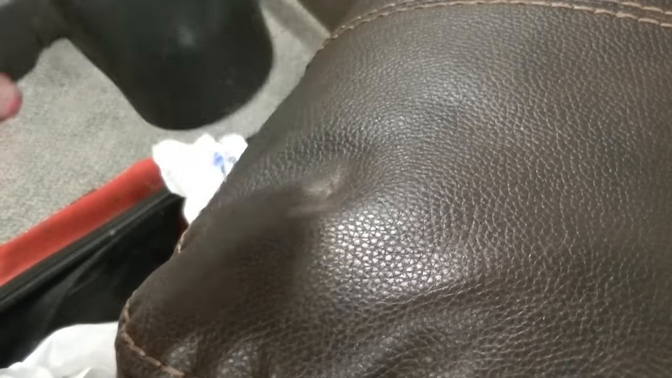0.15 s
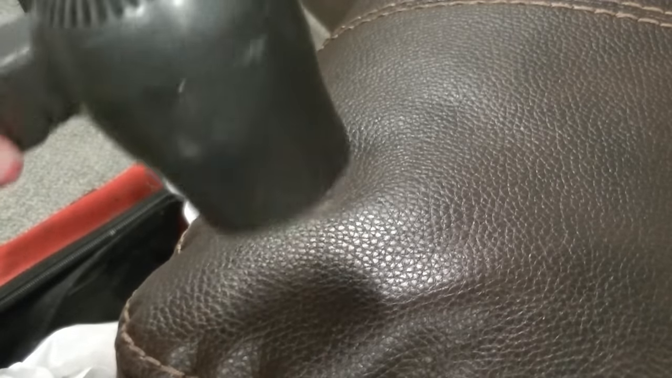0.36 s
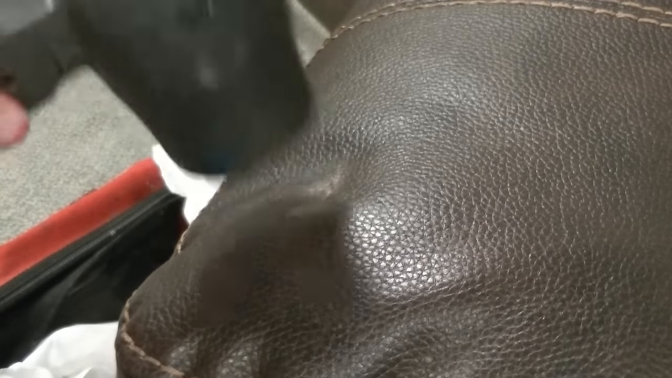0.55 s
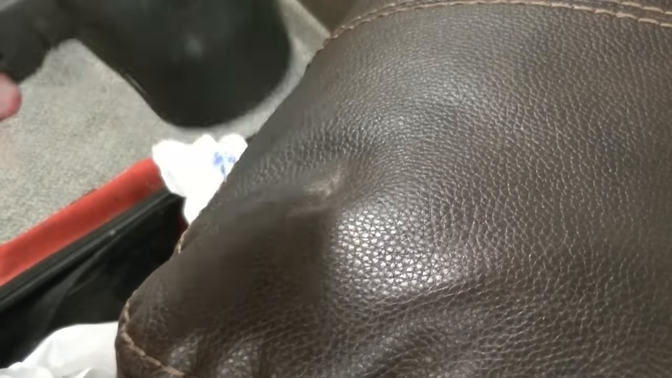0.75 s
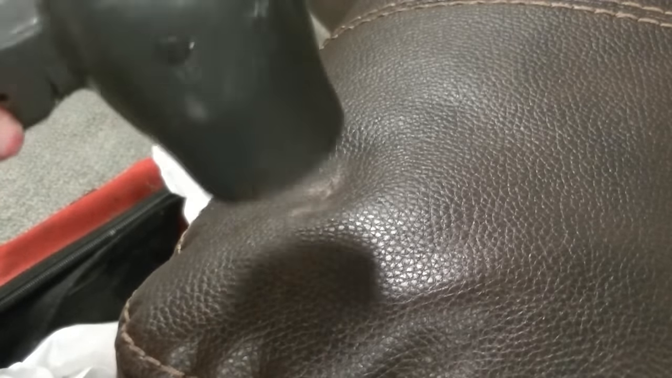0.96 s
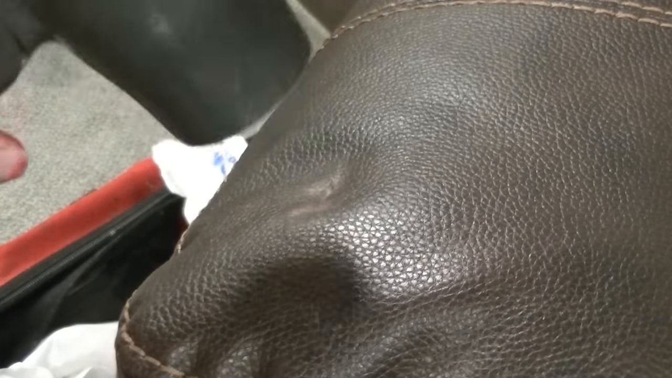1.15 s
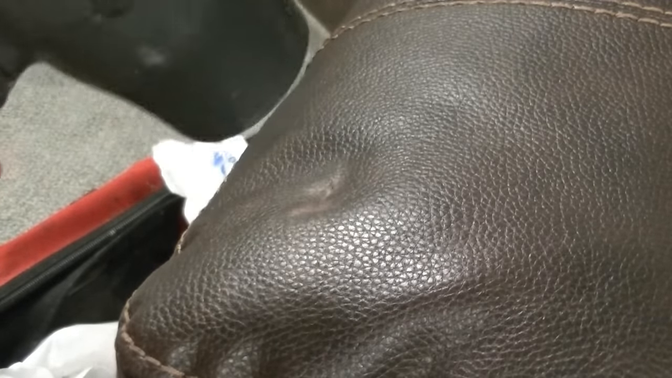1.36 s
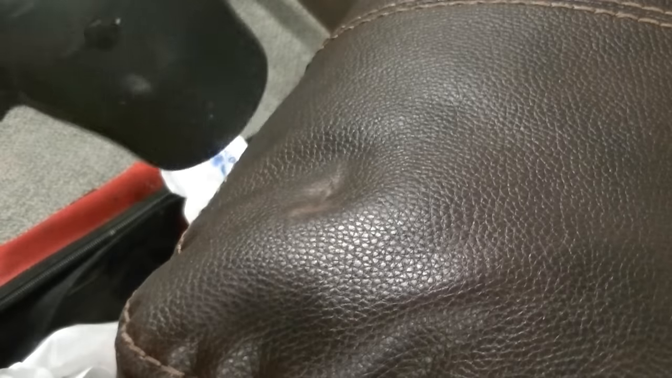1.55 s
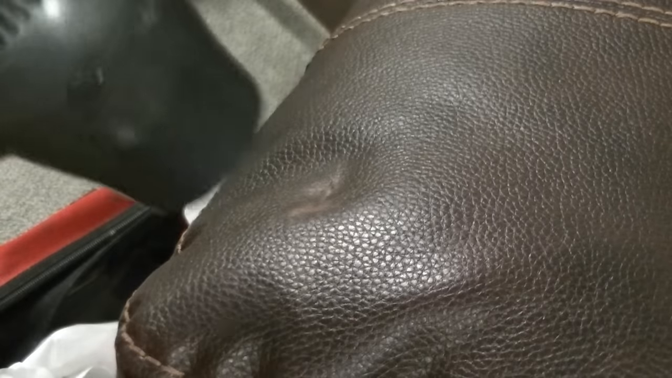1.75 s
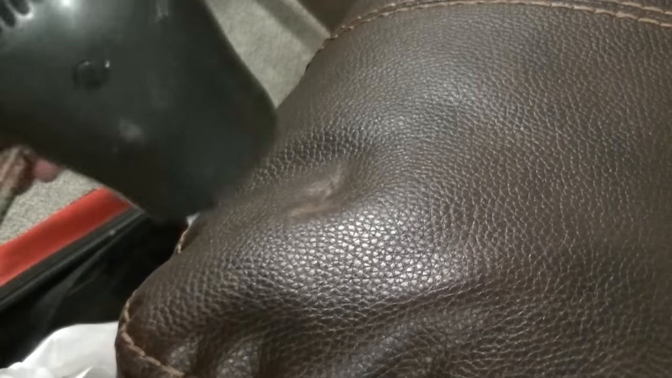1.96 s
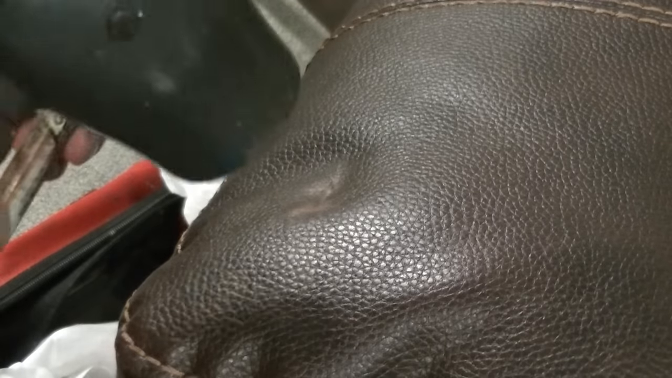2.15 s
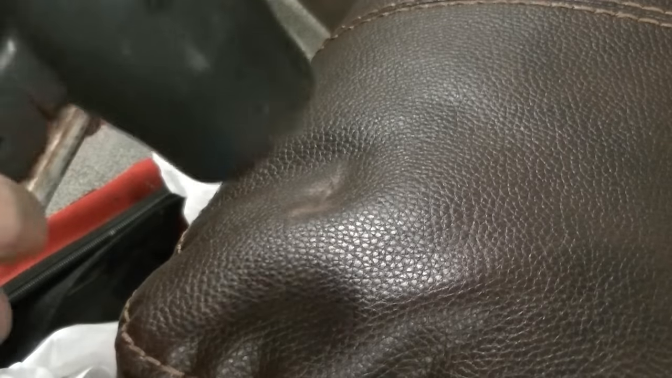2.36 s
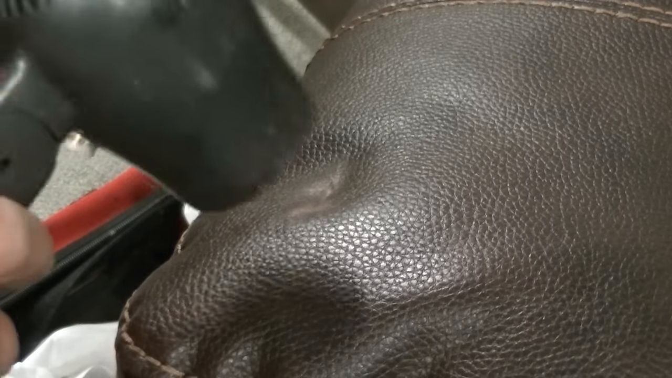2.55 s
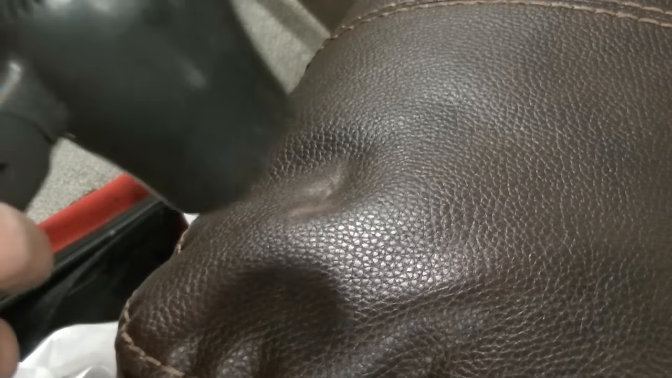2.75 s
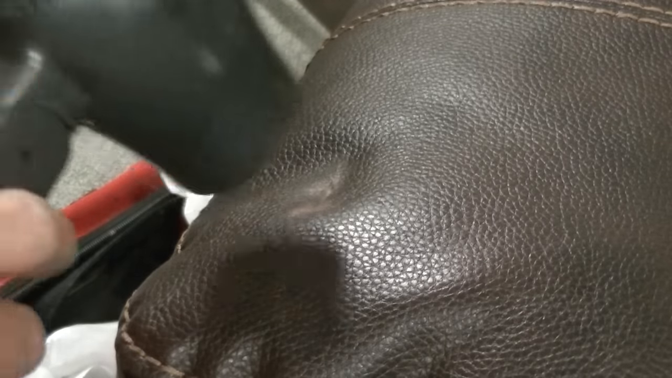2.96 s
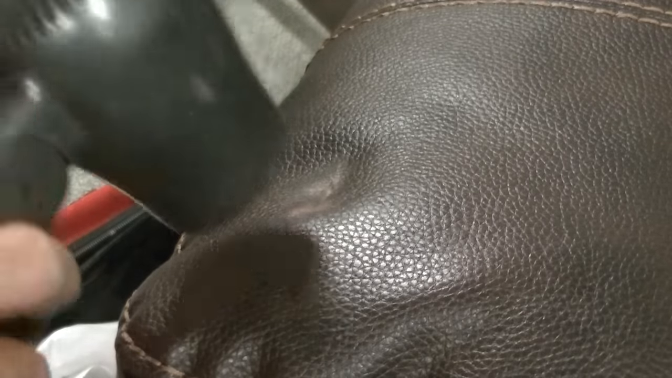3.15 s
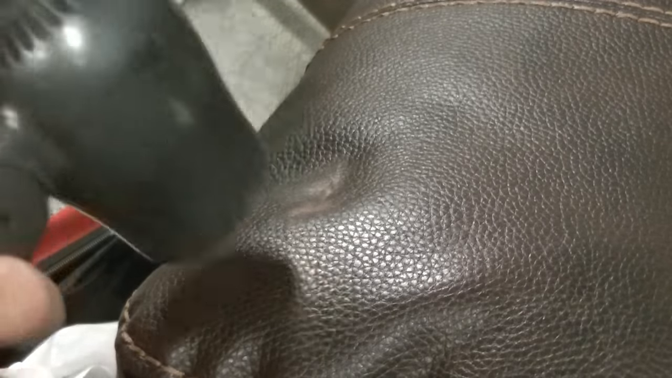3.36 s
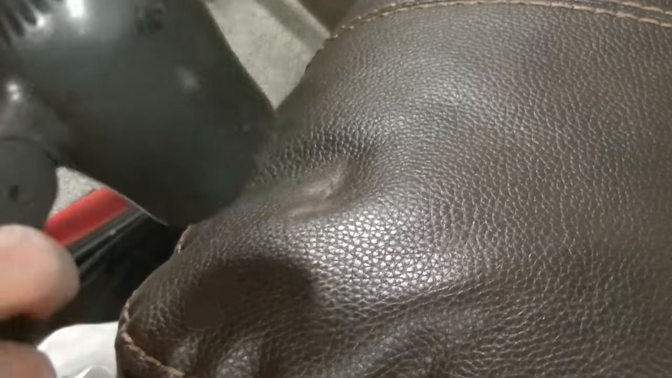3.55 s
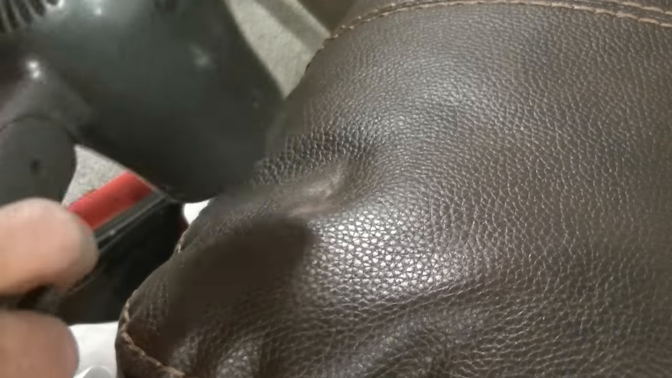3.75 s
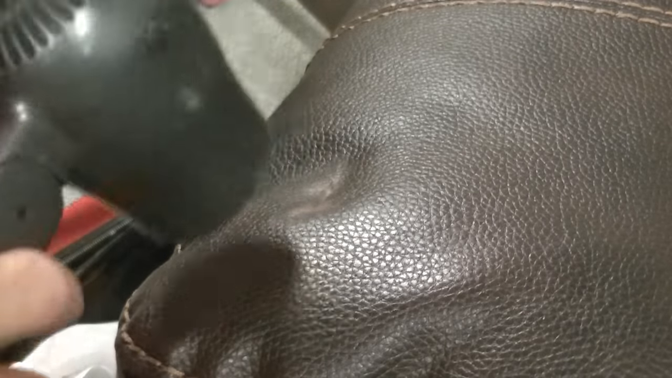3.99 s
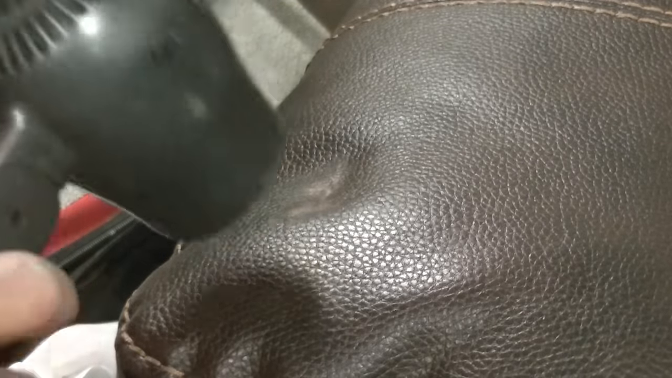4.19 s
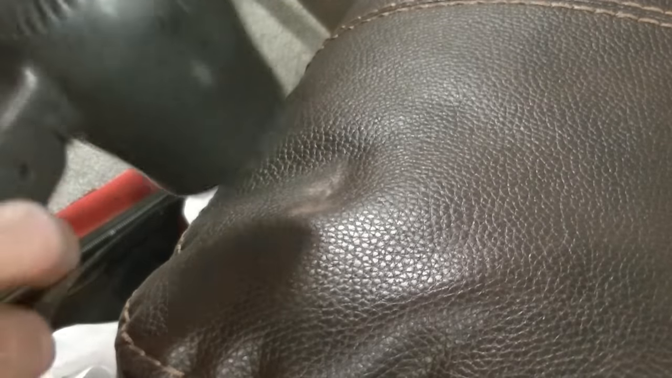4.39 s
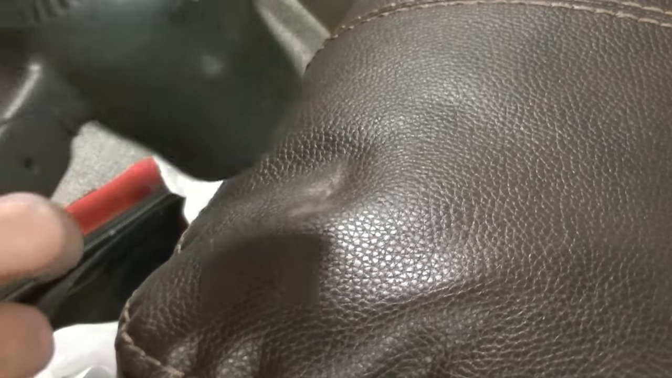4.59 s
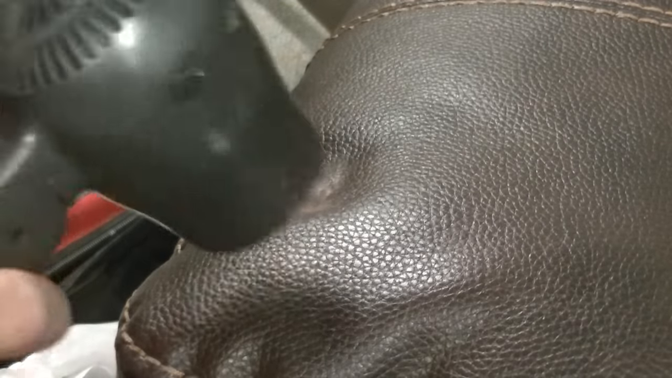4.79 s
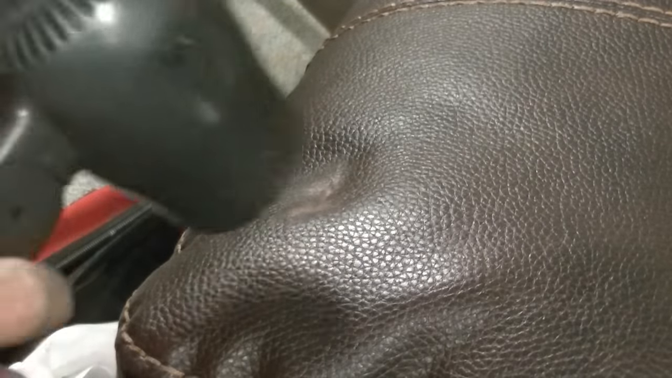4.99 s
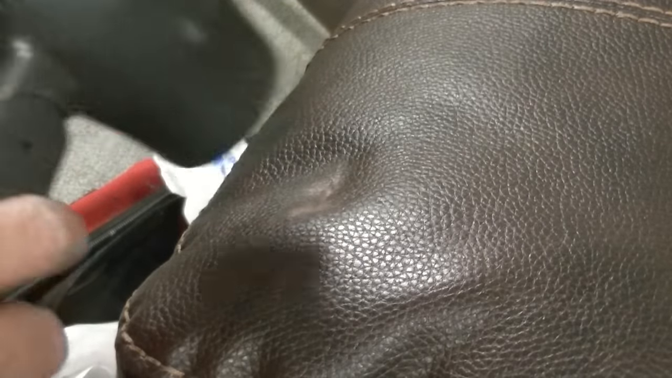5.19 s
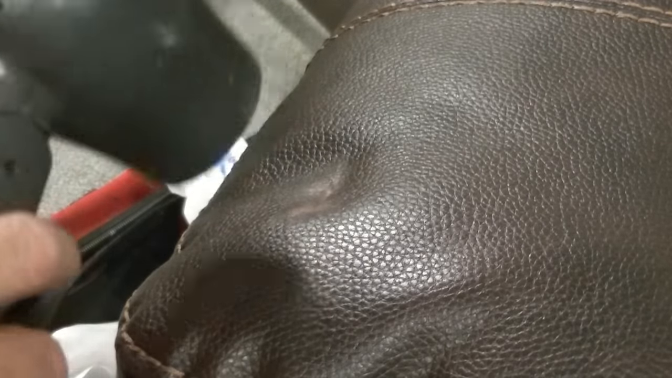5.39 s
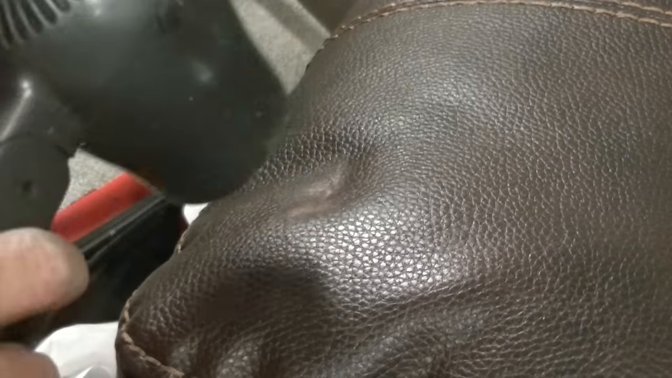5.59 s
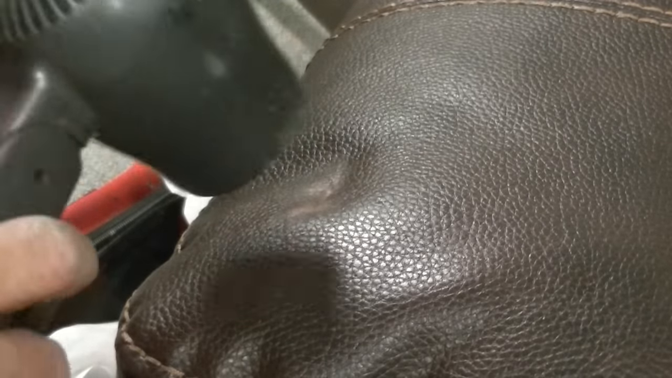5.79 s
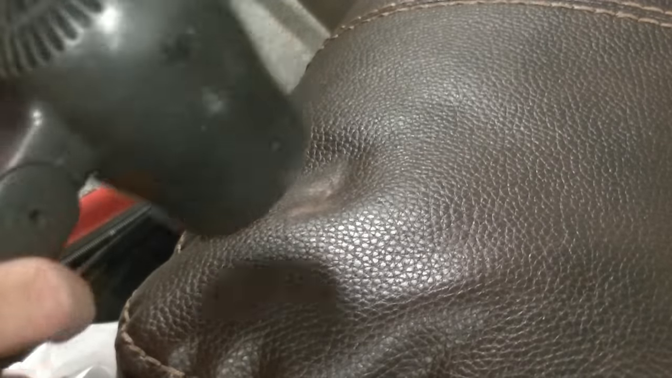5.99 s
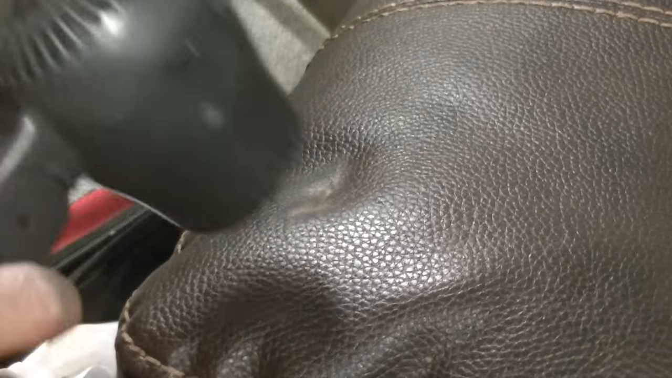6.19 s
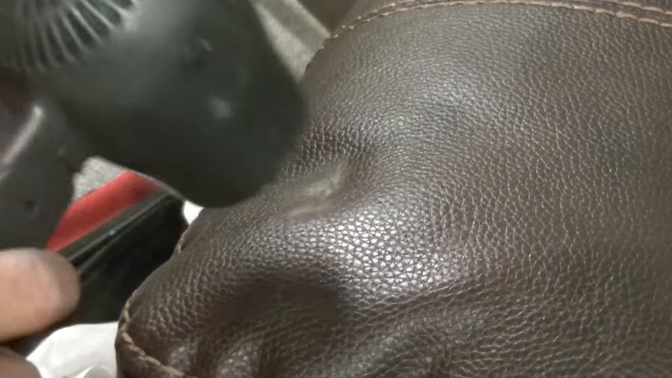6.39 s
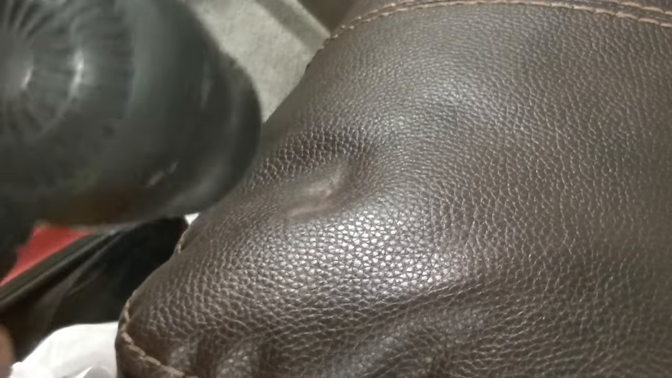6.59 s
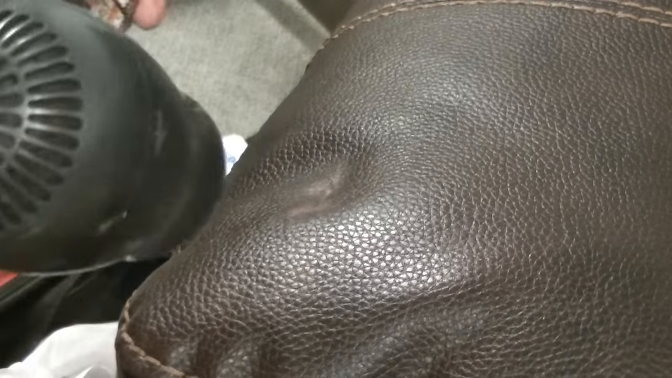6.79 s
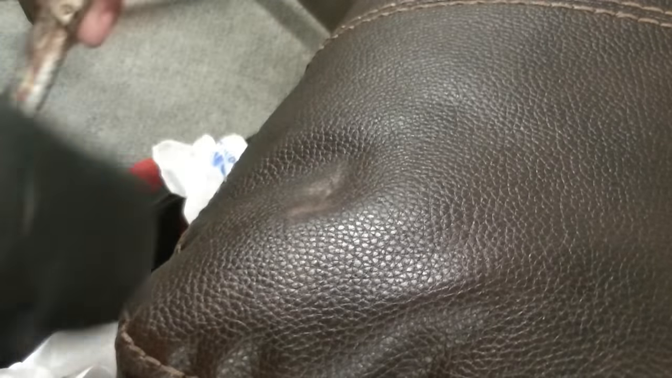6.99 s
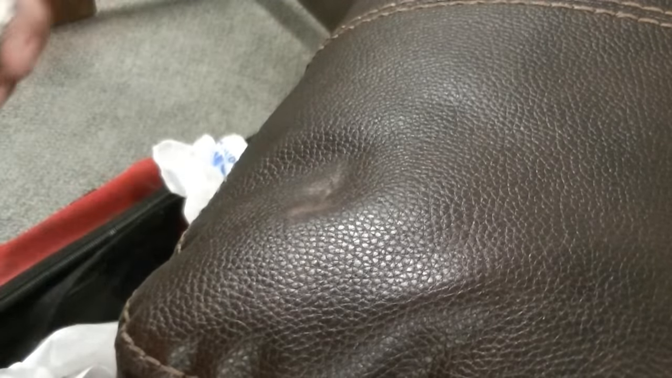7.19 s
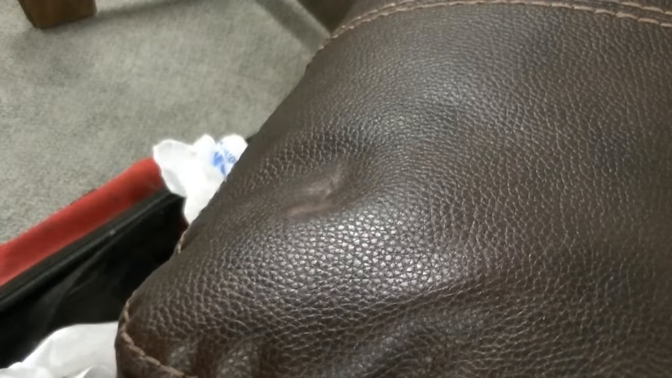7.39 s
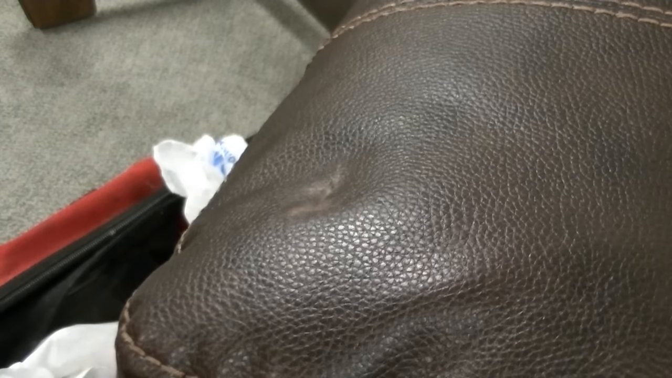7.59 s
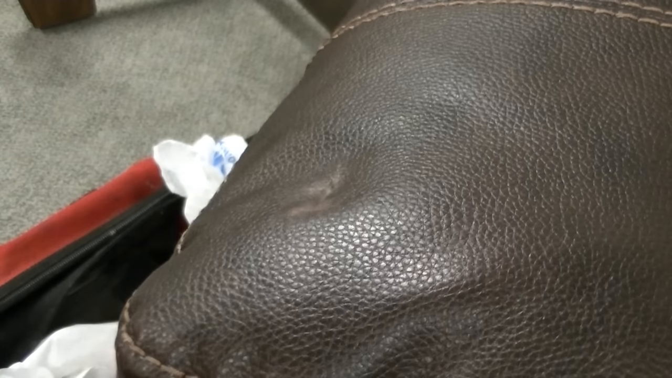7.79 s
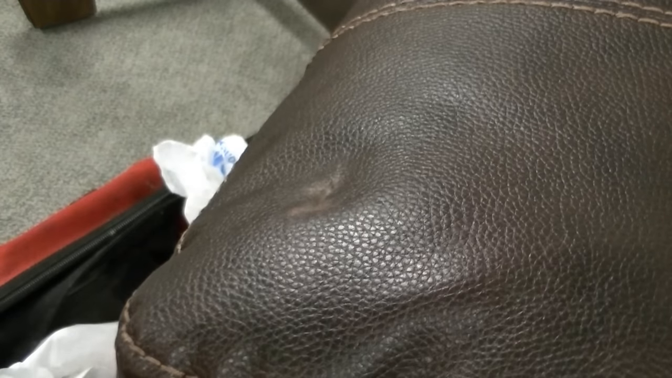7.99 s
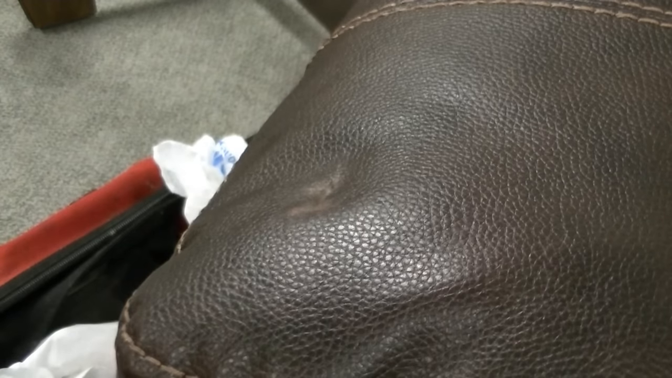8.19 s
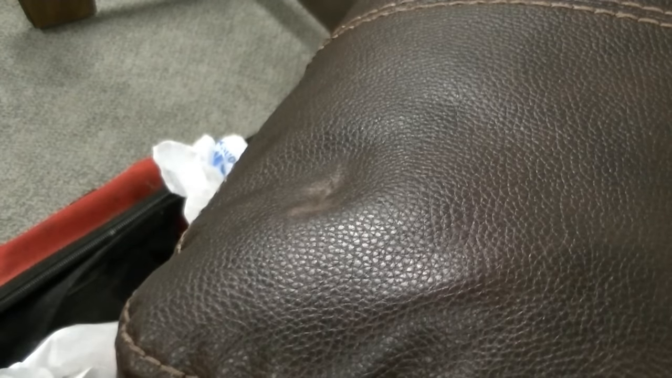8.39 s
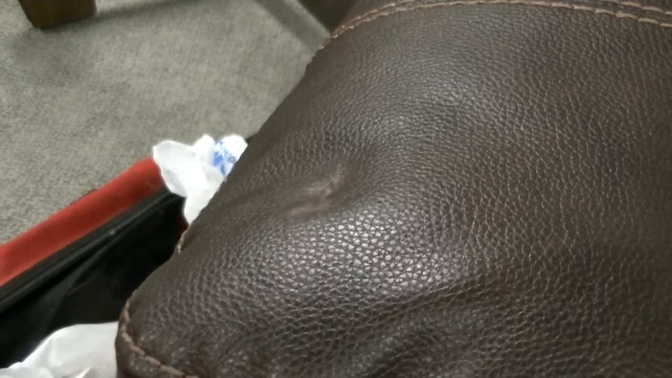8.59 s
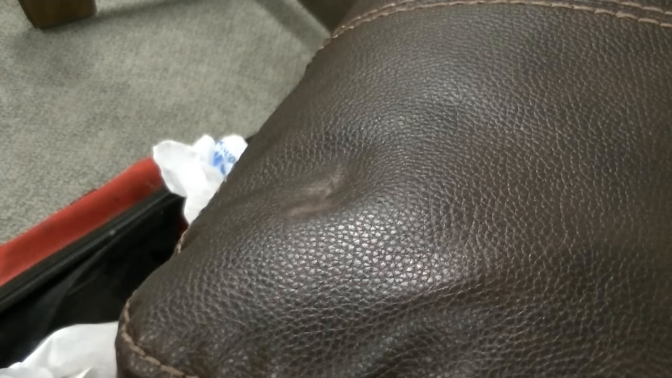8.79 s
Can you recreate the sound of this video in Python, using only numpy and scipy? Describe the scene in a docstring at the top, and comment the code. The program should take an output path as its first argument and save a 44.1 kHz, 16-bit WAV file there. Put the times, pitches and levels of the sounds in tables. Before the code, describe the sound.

A handheld hair dryer runs very close to the microphone in a quiet room, a loud broad air rush with a strong steady whine on top. Quick waving strokes make the tone and airy whistle pulse and bend slightly. Near seven seconds it is switched off; the pitch slides down within half a second, followed by soft rubbing, a few small plastic ticks and faint room murmur.

```python
"""A hair dryer is waved over a leather cushion close to a phone: shaft, seven fan blades and motor whine sing
on multiples of one speed, bent by each stroke, while shaped noise makes the rush, whistle and hiss of the air.
At about seven seconds it is switched off, and its tones glide down as the fan coasts.
Then the hand fumbles and puts it down: resonant noise rubs, short noise bursts tick, a quiet room murmurs."""
import sys
import numpy as np
from scipy import signal
from scipy.fft import rfft, irfft
from scipy.io import wavfile
from scipy.ndimage import uniform_filter1d

SR = 44100
rng = np.random.default_rng(int(sys.argv[2]) if len(sys.argv) > 2 else 0)


def inscribe(sig):
    """Save sig as 16-bit PCM at rate SR to the path in sys.argv[1].

    A 1-D sig is mono; a 2-D sig holds one channel per row.
    Samples are clipped to [-1, 1] before scaling.
    """
    pcm = np.round(np.clip(np.atleast_2d(sig).T, -1, 1) * 32767)
    wavfile.write(sys.argv[1], SR, pcm.astype(np.int16))


N = 390263  # length in samples

# Blade tone and its lower neighbour while running: t/s, blade level/dB, neighbour level/dB
BLADE_TONES = [(0, -19, -26), (1.05, -17, -24.5), (1.55, -21, -28), (2.1, -19.5, -26), (2.4, -18, -25),
               (3.3, -17.3, -23), (5, -18, -22.5), (5.5, -19.5, -24), (6.5, -21, -23.5), (6.7, -21.5, -31),
               (7, -21, -34)]
# Upper tones, stronger as the grille turns to the phone:
# t/s, base level/dB of the second and third blade tones, motor whine level/dB
UPPER_TONES = [(0, -40, -34), (2, -38, -34.5), (3, -35, -33.5), (5, -35, -33.5), (6.4, -35, -32.5),
               (6.7, -38, -31), (7, -38, -29.5)]
# Other multiples of the shaft speed: multiple, level/dB, wavering/dB
SHAFT_TONES = [(1, -47.5, 0.9), (3, -52, 2.5), (4, -44.5, 9.5), (5, -47, 2), (8, -38, 5.5), (10, -37, 4.5),
               (28, -45.5, -2.5)]
# The fan slowing after switch-off: t/s, shaft speed f/Hz, blade tone level/dB
COAST_DOWN = [(7.015, 255.5, -21), (7.046, 238, -23), (7.09, 210, -21), (7.156, 182, -22), (7.18, 173, -20),
              (7.236, 155, -28), (7.302, 135, -32), (7.35, 125, -34), (7.41, 115, -52), (7.6, 85, -75)]


def motor_tones(turn, phase, blade_swell_db):
    """Tones on multiples of the shaft speed; turbulence makes each waver in level and phase."""
    blades, whine_multiple = 7, 35
    blade_db, lower_db = curves(BLADE_TONES)
    upper_db, whine_db = curves(UPPER_TONES)
    _, coast_db = curves(COAST_DOWN)
    off = np.arange(N) / SR > COAST_DOWN[0][0]

    # The blade tone swells with each stroke, mostly on the way in, sometimes on the way out
    blade_db = blade_db - blade_swell_db * np.cos(phase - 0.2) + 0.8 * walk(8)
    lower_db = lower_db + 1.6 * walk(8)
    whine_db = whine_db - 4.2 * np.sin(phase - 0.6)

    # After switch-off the weaker tones die before the blade tone, and the free fan flutters
    fade_db = np.where(off, 1.4 * (coast_db - COAST_DOWN[0][2]) - 12, 0)
    blade_db = np.where(off, coast_db + 2 * walk(40), blade_db)

    def tone(multiple, level_db, waver_db):
        """One sine, its level in dB rms, with random wavering of loudness and phase."""
        loudness = np.sqrt(2) * undb(level_db + waver_db * walk(25))
        return loudness * np.sin(multiple * turn + 0.25 * walk(30))

    out = tone(blades, blade_db, 1.0)
    out += tone(blades - 1, lower_db + fade_db, 0.66)
    out += tone(2 * blades, upper_db + 1 + fade_db, 1.5)
    out += tone(3 * blades, upper_db - 3 + fade_db, 2)
    out += tone(whine_multiple, whine_db + 3 * fade_db, 1.5)
    for multiple, level_db, waver_db in SHAFT_TONES:
        out += tone(round(multiple), level_db + fade_db, waver_db)
    return out


# Shaft speed while running, before the Doppler bend: t/s, f/Hz
RUNNING_SPEED = [(0, 257.2), (.5, 256.8), (1.2, 256.9), (1.5, 256.5), (1.75, 256.3), (2, 256.7), (5, 256.6),
                 (5.45, 255.9), (5.9, 255.9), (6.2, 256.4), (6.6, 255.9), (6.85, 255.4), (7.02, 255.5)]


def shaft_turn(phase, hand_m_s):
    """Shaft angle in radians: the speed added up over time, bent by Doppler shift until switch-off."""
    sound_m_s = 343
    doppler = 1 - hand_m_s * np.cos(phase) / sound_m_s
    running_hz = curves(RUNNING_SPEED)[0] * doppler
    coast_hz, _ = curves(COAST_DOWN)
    off = np.arange(N) / SR > COAST_DOWN[0][0]
    return 2 * np.pi * np.cumsum(np.where(off, coast_hz, running_hz)) / SR


# Strokes of the hand: t/s of the fastest move away from the phone, top speed/(m/s),
# blade tone swell level/dB, whistle swell level/dB
HAND_STROKES = [(-.06, 2.0, 4.5, 1), (.235, 1.9, 0, -3), (.55, 1.7, 3, 4.5), (.855, 1.6, 2, 0),
                (1.125, 1.3, 1.5, 5), (1.4, .5, 1.5, -1), (1.64, 0.67, 1, -1), (1.9, 1.2, 1.5, 5),
                (2.13, 1.1, 3.5, -3), (2.35, 1.2, 0.5, 5), (2.56, 1, -0.5, 9), (2.78, 1.7, 0, 3),
                (2.983, 1.36, 2, 5), (3.183, 1.2, -3, 2), (3.402, 0.77, 3, 4), (3.637, 0.74, 0, 11),
                (3.841, 1.1, 1, 0.5), (4.085, 1.5, -1.5, 2), (4.295, 1.1, 3.5, 0.5), (4.495, 1.2, -2, 10.5),
                (4.725, 1.3, 0, 3.5), (4.994, 1.6, 1, 7), (5.223, 1.3, -0.5, 4.5), (5.47, 1.2, 1, -2.5),
                (5.682, 1.33, 2.5, 5), (5.897, 1.3, 3, -1), (6.106, 1.4, 1.5, 2.5), (6.306, 1.1, 7, 4),
                (6.51, 1.4, 2, 3.5), (6.765, 0.89, -0.5, 1.5), (7.0, .1, -1.5, -2)]


def waving_hand():
    """Each stroke is one cycle: phase in radians (0 = moving away fastest), top speed and the two swells."""
    start_s = np.transpose(HAND_STROKES)[0]
    cycles = np.interp(np.arange(N) / SR, start_s, np.arange(len(start_s)))
    return 2 * np.pi * cycles, *curves(HAND_STROKES)


# Air over time: t/s, level/dB of all the air, then level/dB relative to it of
# the high gap resonance, the barrel whistle and the grille hiss
AIR_LEVELS = [(0, -14, -10.5, -14, -6), (1, -13.5, -11, -14, -7), (1.5, -14, -12, -18.5, -7),
              (2.2, -12.5, -11, -11.5, -7), (2.7, -12.5, -8.5, -20, -7.5), (3.5, -13, -8.5, -19, -5.5),
              (4.4, -12, -8.5, -16, -7.5), (4.8, -13.5, -7, -18, -5.5), (5.5, -12, -9, -15.5, -6.5),
              (6.1, -12, -12, -13, -6.5), (6.67, -11.5, -17.5, -13.5, -5.5), (6.88, -12, -26, -10, -4.5),
              (7.01, -11.5, -13, -13, -5.5), (7.05, -13, -12, -15, -7), (7.17, -21.5, -23, -16.5, -3.5),
              (7.34, -38.5, -18, -13, -9), (7.6, -53, -16, -19, -22)]
# Low resonance of the nozzle-to-leather gap, fading as the nozzle nears and returning as it leaves:
# t/s, level/dB relative to all the air
LOW_GAP_LEVELS = [(0, -15.5), (.7, -14.5), (2.1, -13), (2.4, -18.5), (2.8, -30), (6.5, -26.5), (7, -22),
                  (7.2, -16), (7.35, -12), (7.6, -17)]
# Colour of the rushing air: f/Hz, relative level/dB per Hz
RUSH_COLOUR = [(40, -64), (130, -62), (220, -42), (350, -29.5), (480, -29), (625, -18.5), (730, -27),
               (880, -21), (1020, -12), (1500, -11), (2000, -12.5), (3000, -16), (5000, -19), (9500, -23),
               (11500, -27.5), (15700, -39)]
# Resonances colouring the rush: f/Hz, width f/Hz, level/dB over the rush colour
RUSH_RESONANCES = [(1166, 290, 5), (2442, 340, 2), (4136, 130, 1), (6830, 810, 2.5), (10350, 1300, -0.5)]
# Stereo width of the noise: f/Hz, side minus mid level/dB
RUSH_WIDTH = [(60, -3.5), (200, -27.5), (2400, -38), (15000, -44)]


def air(turn, hz, phase, whistle_swell_db):
    """Turbulent air with a resonant colour, pulsing faintly once a turn and swelling with each stroke."""
    air_db, high_gap_db, whistle_db, hiss_db = curves(AIR_LEVELS)
    low_gap_db, = curves(LOW_GAP_LEVELS)
    near = -np.sin(phase)  # 1 = nearest the phone, -1 = farthest

    resonance_power = 1
    for f, width_hz, level_db in RUSH_RESONANCES:
        resonance_power = resonance_power + undb(2 * level_db) / (1 + (2 * (hz - f) / width_hz) ** 2) ** 2
    spectrum = noise(shape(RUSH_COLOUR, hz) * np.sqrt(resonance_power), RUSH_WIDTH, hz)
    rush = part(spectrum, hz, 0.87, 5020)
    hiss = part(spectrum, hz, 5080, SR)

    out = rush / rms(rush) * undb(-3.0 + 0.89 * walk(9.8))
    out += hiss / rms(hiss) * undb(hiss_db + 0.1 * near + 0.5 * walk(11))
    out += ring(800, 180) * undb(low_gap_db)
    out += ring(1640, 290) * undb(high_gap_db - 1.3 * near + 0.69 * walk(6))
    out += ring(2705, 100) * undb(whistle_db + whistle_swell_db * near + 2.2 * walk(12))

    fan_stop = np.clip((7.75 - np.arange(N) / SR) / 0.18, 0, 1)  # fades out the last air
    turn_pulse = 1 + 0.047 * np.sin(turn)
    return out * undb(air_db + 0.39 * near) * fan_stop * turn_pulse


# Ticks of the plastic shell: t/s, peak level/dB, pitch f/Hz, filter width f/Hz, 60 dB decay t/s
SHELL_TICKS = [(7.680, -30, 1700, 2600, .025), (7.702, -37, 3000, 3000, .025),
               (7.711, -39, 6500, 2000, .02), (7.836, -42, 1700, 1000, .02), (7.845, -39, 1700, 900, .02),
               (7.852, -36, 1500, 900, .025), (7.960, -39, 800, 300, .06), (7.982, -33, 3100, 2200, .035),
               (8.221, -46, 1500, 1500, .03)]


def shell_ticks():
    """A sharp contact and a short burst of noise rung in the shell, each with its own colour."""
    out = np.zeros(N)
    t = np.arange(4000) / SR
    for start_s, peak_db, hz, width_hz, decay_s in SHELL_TICKS:
        contact = rng.standard_normal(len(t)) + 5 * (t == 0)
        shell = signal.iirpeak(hz, hz / width_hz, fs=SR)
        rung = signal.lfilter(*shell, signal.lfilter(*shell, contact))
        hit = rung * np.exp(-np.log(1000) * t / decay_s)
        i = int(start_s * SR)
        out[i:i + len(t)] += undb(peak_db) * hit / np.abs(hit).max()
    return out


# Room and hand, the first row also holding before its time:
# t/s, room murmur level/dB, hollow rubbing level/dB, rustle level/dB
ROOM_LEVELS = [(7.3, -43, -35, -45), (7.42, -45, -43, -56), (7.58, -48.5, -53, -55), (7.72, -49, -53, -54),
               (7.785, -49, -44, -55), (7.82, -49, -52, -55), (7.93, -52, -58, -56),
               (8.08, -54.5, -68, -59), (8.4, -54.5, -66, -61), (8.85, -57.5, -73, -63)]
# Colour of the room and rustle noise: f/Hz, relative level/dB per Hz
ROOM_COLOUR = [(40, -21.5), (120, -28.5), (250, -12), (480, 2.5), (800, 4), (1100, 4.5), (1500, -1.5),
               (3000, -13.5), (4000, -16), (5300, -16.5), (6700, -10.5), (8000, -19.5), (15700, -28)]
# Stereo width of the quiet noise: f/Hz, side minus mid level/dB
ROOM_WIDTH = [(60, 0), (300, -35), (8000, -3), (15000, -27)]


def room_and_hand(hz):
    """Noise bands make the house's murmur and bass and a cloth rustle; the rubbed hollow barrel resonates."""
    murmur_db, hollow_db, rustle_db = curves(ROOM_LEVELS)
    spectrum = noise(shape(ROOM_COLOUR, hz), ROOM_WIDTH, hz)
    murmur = part(spectrum, hz, 0.91, 2200)
    rustle = part(spectrum, hz, 2200, SR)
    bass = part(spectrum, hz, 0.91, 264)

    out = murmur / rms(murmur) * undb(murmur_db + 1.8 * walk(14))
    out += rustle / rms(rustle) * undb(rustle_db + 1.2 * walk(41))
    out += bass / rms(bass) * undb(-73.5)  # steady
    return out + ring(820, 190) * undb(hollow_db + 1.5 * walk(60))


def room_echo(tones):
    """The room's answer to the tones: a decaying noise tail smears the falling glide."""
    echo_db, decay_60db_s = -17, 0.3
    t = np.arange(SR // 2) / SR
    tail = rng.standard_normal(len(t)) * np.exp(-np.log(1000) * t / decay_60db_s)
    tail /= np.sqrt(np.sum(tail ** 2))
    return undb(echo_db) * signal.fftconvolve(tones, tail)[:N]


def undb(db):
    """Gain of a level in dB."""
    return 10 ** (np.asarray(db) / 20)


def rms(x):
    """Root mean square, the average strength of a sound."""
    return np.sqrt(np.mean(x ** 2))


def curves(table):
    """Columns of a table that starts with t/s, joined by straight lines sample by sample."""
    s, *columns = np.transpose(table)
    return [np.interp(np.arange(N) / SR, s, column) for column in columns]


def walk(rate_hz):
    """Random levels held 1 / rate_hz seconds, then smoothed twice; spread near 1."""
    hold = int(SR / rate_hz)
    steps = np.repeat(rng.standard_normal(N // hold + 1), hold)
    smooth = uniform_filter1d(uniform_filter1d(steps, hold), hold)
    return 1.3 * smooth[:N]


def shape(points, hz):
    """Gain at the frequencies hz, drawn through points of f/Hz, level/dB."""
    f, db = np.transpose(points)
    return undb(np.interp(np.log(hz + 1), np.log(f), db))


def noise(gain, side_points, hz):
    """Two-channel noise spectrum: a shared middle plus a side signal of opposite sign left and right."""
    mid, side = rfft(rng.standard_normal((2, N)))
    opposite = np.array([[1], [-1]])
    return gain * (mid + shape(side_points, hz) * side * opposite)


def part(spectrum, hz, lo_hz, hi_hz):
    """The sound of a spectrum between two soft crossovers."""
    below_hi = 1 / (1 + (hz / hi_hz) ** 6)
    below_lo = 1 / (1 + (hz / lo_hz) ** 6)
    return irfft(spectrum * (below_hi - below_lo), N)


def ring(hz, width_hz):
    """Noise rung through a narrow and a twice as wide filter at one pitch, rms 1."""
    x = signal.lfilter(*signal.iirpeak(hz, hz / width_hz, fs=SR), rng.standard_normal(N))
    x = signal.lfilter(*signal.iirpeak(hz, hz / width_hz / 2, fs=SR), x)
    return x / rms(x)


def scene():
    """Dryer close to the phone, then the quiet room."""
    hz = np.arange(N // 2 + 1) * SR / N
    phase, hand_m_s, blade_swell_db, whistle_swell_db = waving_hand()
    turn = shaft_turn(phase, hand_m_s)
    tones = motor_tones(turn, phase, blade_swell_db)
    dryer = tones + room_echo(tones) + air(turn, hz, phase, whistle_swell_db)
    return dryer + shell_ticks() + room_and_hand(hz)


def record(dry):
    """The highest peaks are flattened, the deepest bass weakened and everything above 15.7 kHz removed."""
    flattened = np.clip(dry, -1, 1)
    bass_cut = signal.butter(1, 70, "high", fs=SR, output="sos")
    top_cut = signal.ellip(12, 0.2, 85, 15720, fs=SR, output="sos")  # 0.2 dB ripple, 85 dB down above
    return signal.sosfilt(top_cut, signal.sosfilt(bass_cut, flattened))


dry = scene()
out = record(dry)
inscribe(out)
```